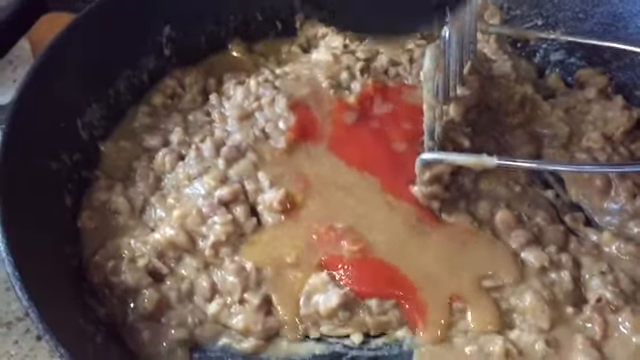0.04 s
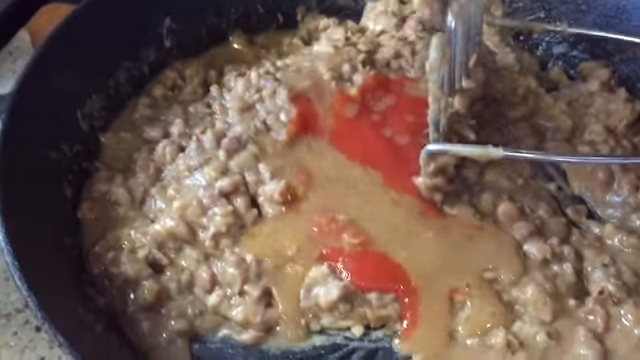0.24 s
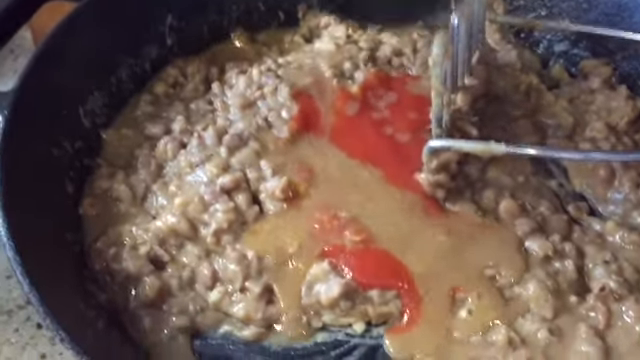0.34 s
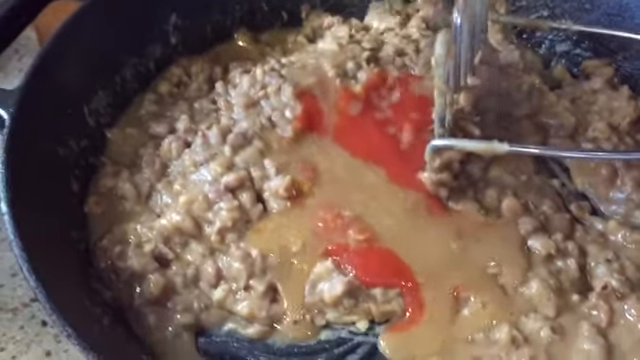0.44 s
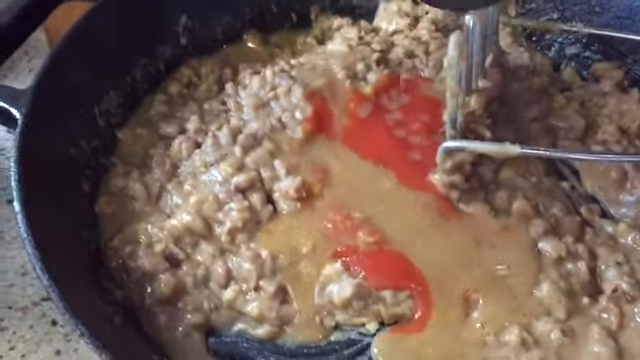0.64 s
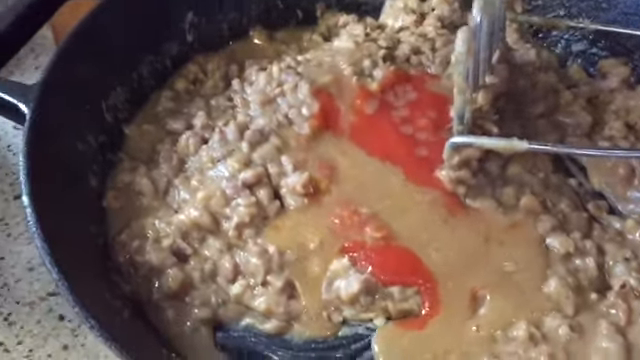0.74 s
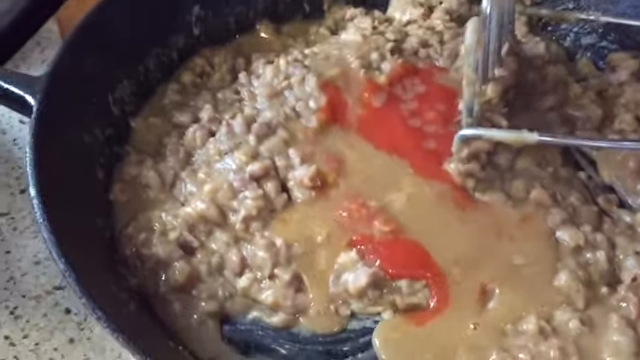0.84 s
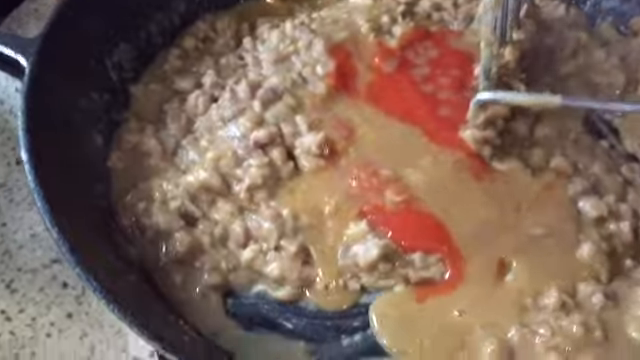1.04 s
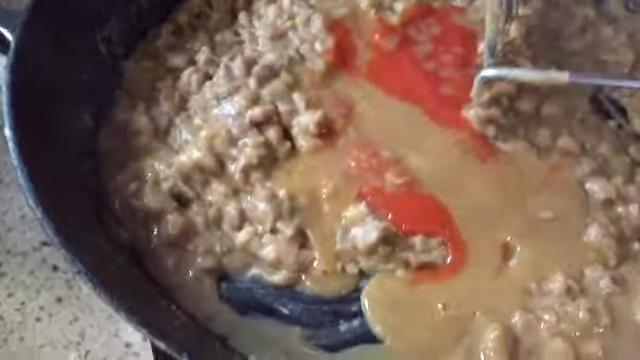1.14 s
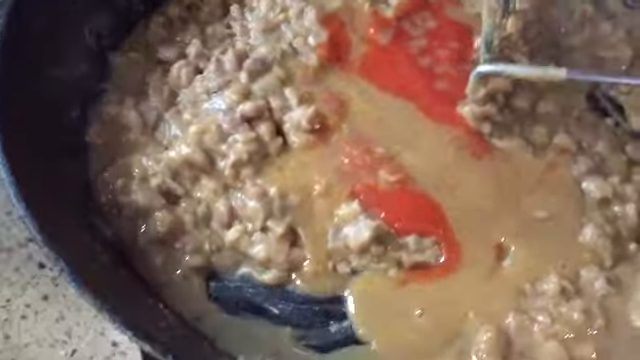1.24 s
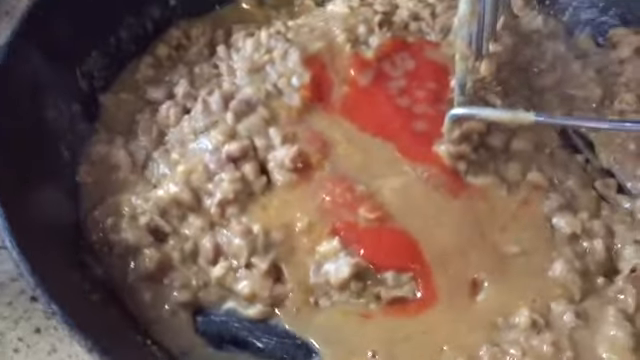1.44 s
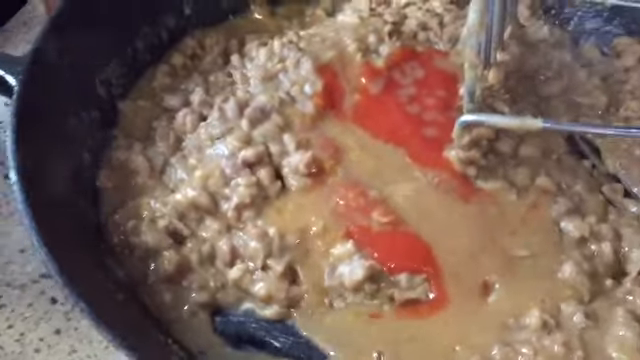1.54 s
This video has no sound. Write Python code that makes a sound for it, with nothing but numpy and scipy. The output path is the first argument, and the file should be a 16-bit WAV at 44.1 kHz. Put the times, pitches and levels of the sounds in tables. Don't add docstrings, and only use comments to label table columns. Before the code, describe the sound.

Four rapid hard clacks of a wire masher on a heavy iron pan, the third rattling most, then only faint wet food ticks over quiet low rumble and hiss; close, mono, short kitchen reverberation.

```python
import sys
import numpy as np
from scipy import signal
from scipy.fft import rfft, irfft
from scipy.io import wavfile

SR = 44100
rng = np.random.default_rng(int(sys.argv[2]) if len(sys.argv) > 2 else 0)


def transcribe(signal):
    frames = np.atleast_2d(signal).T
    limited = np.clip(frames, -1, 1)
    pcm = np.round(limited * 32767).astype(np.int16)
    wavfile.write(sys.argv[1], SR, pcm)


def field_ratio(decibels):
    return 10 ** (np.asarray(decibels, dtype=float) / 20)


N = 70560

# pitch_hz, level_db, t60_s
CLACK_MODES = [(1961, 4, .016), (2217, 5.5, 0.012)]
# start_s, clack_db, crack_db, iron_db (ring and room tail), bowl_db (hum)
KNOCKS = [
    (0.1032, -39, -46, -59, -80.5),
    (0.235, -12.5, -12, -37.5, -37),
    (0.3986, -16.5, -13.5, -41.5, -39.5),
    (0.5432, -17, -9, -39.5, -67),
    (0.7137, -18.5, -16, -38.5, -62),
]
start_s, clack_db, crack_db, iron_db, bowl_db = np.transpose(KNOCKS)


def clack():
    out = np.zeros(N)
    lag_s = 0.0005
    for k, (pitch_hz, level_db, t60_s) in enumerate(CLACK_MODES):
        hits = clicks(start_s + lag_s, field_ratio(clack_db + level_db))
        out += (-1) ** k * ring(hits, pitch_hz, t60_s)
    return out


# pitch_hz, level_db, t60_s
MASHER_MODES = [(1361, -19, 0.045), (3024, -13, .012), (2917, -20.5, 0.019), (3634, -7, 0.0098),
                (4012, -5.5, 0.0075), (4526, -7.5, 0.012), (5360, -14, 0.032), (6040, -10.5, 0.03),
                (6714, -19, 0.014), (6970, -9, 0.011), (8738, -20, 0.009), (9400, -22, 0.016),
                (10185, -40.5, .008), (13010, -31, 0.002)]


def masher_crack():
    luck_db = mode_luck_db(len(MASHER_MODES))
    out = ring(clicks(start_s, field_ratio(crack_db - 3)), 4200, 0.0022)
    for k, (pitch_hz, level_db, t60_s) in enumerate(MASHER_MODES):
        hits = clicks(start_s, field_ratio(crack_db + level_db + luck_db[:, k]))
        out += (-1) ** k * ring(hits, pitch_hz, t60_s)
    return out


def contact_snap():
    t60_s, low_hz, high_hz = 0.023, 2490, 8000
    hits = clicks(start_s, field_ratio(crack_db - 3))
    decay = signal.lfilter([1], [1, -field_ratio(-60 / (t60_s * SR))], hits + 1e-18)
    band = signal.butter(1, [low_hz, high_hz], "band", fs=SR, output="sos")
    return decay * signal.sosfilt(band, rng.standard_normal(N))


def thud():
    return ring(clicks(start_s, field_ratio(clack_db - 23)), 562, 0.044)


# start_s, level_db, centre_hz, length_s
REBOUNDS = [(0.1220, -47.5, 1820, 0.0018), (0.2440, -18, 1320, 0.0015), (0.2470, -27, 875, 0.0027),
            (0.4080, -28.5, 1356, 0.0013), (0.5532, -9.5, 2106, 0.0029), (0.5535, -14, 1286, 0.0027),
            (0.5533, -14.5, 3370, 0.0013), (0.5500, -14, 3780, 0.00081), (0.7240, -23, 6260, 0.0014),
            (0.5566, -11, 2160, 0.00067), (0.5586, -16, 2050, 0.0016), (0.5618, -27.5, 1850, 0.0013),
            (0.5640, -25, 1096, .003), (0.5708, -25, 2600, 0.0026), (0.7225, -22.5, 1072, 0.0043),
            (0.7250, -18.5, 1790, 0.001), (0.7600, -40.5, 2280, 0.0097)]
# start_s, level_db, centre_hz, length_s
TICKS = [(0.0155, -59, 7300, 0.0022), (0.0152, -47, 5500, .0003), (0.0480, -52.5, 3930, 0.00033),
         (0.0890, -60, 8000, 0.00011), (0.0970, -64.5, 1480, 0.0034), (0.1080, -53.5, 980, 0.01),
         (0.1470, -66, 2900, 0.00091), (0.1760, -57.5, 3500, 0.0009), (0.1820, -54.5, 6770, 0.00073),
         (0.2350, -44, 174.9, 0.024), (0.2750, -40.5, 140, 0.044), (0.6595, -58, 6100, 0.00026),
         (0.9200, -68, 8700, .0002), (1.0730, -64, 3470, 0.0045), (1.1700, -61.5, 6130, .0003),
         (1.2135, -44, 2900, 0.0018), (1.2080, -53, 2850, 0.0046), (1.2140, -66, 6020, .001),
         (1.4270, -66, 8750, .0003), (1.4750, -55.5, 304.3, 0.034), (1.4830, -63, 1680, 0.035),
         (1.4900, -69.5, 3686, .02), (1.5830, -63.5, 5460, 0.00032)]


def touches(contacts):
    out = np.zeros(N)
    for touch_s, level_db, centre_hz, length_s in contacts:
        hit = clicks([touch_s], field_ratio(level_db))
        for side in (-1, 1):
            out += side * ring(hit, centre_hz + side * 0.5 / length_s, 3.36 * length_s)
    return out


# pitch_hz, level_db, t60_s
SKILLET_MODES = [(588, -14, .9), (1058, -11, .5), (1766, -14, .4), (2510, -13, .25), (2790, -17, .2),
                 (530, -8, .15), (680, -4, .18), (830, -5, .2), (937, -4, .15), (1285, -2, .16),
                 (1525, -8, .16), (1968, -3, .16), (2202, -5, .14), (3195, -13, .2)]
# pitch_hz, level_db, t60_s
REBOUND_RING = [(2523, -45.5, .3), (2580, -51.5, .4), (331, -57, 0.41)]


def skillet_ring():
    luck_db = mode_luck_db(len(SKILLET_MODES))
    out = ring(clicks([0], field_ratio(-55)), SKILLET_MODES[0][0], SKILLET_MODES[0][2])
    for k, (pitch_hz, level_db, t60_s) in enumerate(SKILLET_MODES):
        hits = clicks(start_s, field_ratio(iron_db + level_db + luck_db[:, k]))
        out += waver() * ring(hits, pitch_hz, t60_s)
    for pitch_hz, level_db, t60_s in REBOUND_RING:
        out += ring(clicks([REBOUNDS[4][0]], field_ratio(level_db)), pitch_hz, t60_s)
    out += bowl_hum()
    damped_at_s, damped_t60_s = 0.89, 0.15
    resting_s = np.maximum(np.arange(N) / SR - damped_at_s, 0)
    return out * field_ratio(-60 * resting_s / damped_t60_s)


def bowl_hum():
    pitch_hz, t60_s, lag_s, swell_hz = 334, 0.19, 0.015, 9.2
    first = ring(clicks(start_s + lag_s, field_ratio(bowl_db)), pitch_hz, t60_s)
    hum = ring(first, pitch_hz, 1 / swell_hz)
    return waver() * hum * 2 * np.log(1000) * swell_hz / SR


def waver():
    depth, rate_hz, settle = 0.4, 12, 4000
    r = np.exp(-2 * np.pi * rate_hz / SR)
    drift = signal.lfilter([1], [1, -2 * r, r * r], rng.standard_normal(N + settle))
    return 1 + depth * rms_one(drift[settle:])


# pitch_hz, t60_s
ROOM_T60 = [(300, 0.1742), (800, 0.4047), (2100, 0.13), (5500, 0.22), (12000, 0.115)]
# pitch_hz, level_db
ROOM_COLOUR = [(300, 5), (900, -7), (2000, 2.5), (4000, 1.5), (8000, -13.5), (14000, -0.5)]


def kitchen_return(x):
    t = np.arange(SR // 2) / SR
    tail = np.zeros(len(t))
    for hz, band in third_octaves():
        tail += band[:len(t)] * field_ratio(at_hz(ROOM_COLOUR, hz) - 60 * t / at_hz(ROOM_T60, hz))
    rise_s = 0.0013
    tail = tail * (1 - np.exp(-t / rise_s)) / np.sqrt(SR / 60)
    return field_ratio(-9.5) * signal.fftconvolve(x, tail)[:N]


# pitch_hz, level_db
TAIL_COLOUR = [(200, -13), (500, -5.5), (1000, -6.5), (2000, 3), (4000, -5), (7000, -12.5), (11000, -22),
               (15500, -22.5)]


def knock_tail():
    rise_s = 0.0015
    hits = clicks(start_s, field_ratio(2 * iron_db)) + 1e-18
    hits = signal.lfilter([1], [1, -np.exp(-1 / (rise_s * SR))], hits) / (rise_s * SR)
    out = np.zeros(N)
    for hz, band in third_octaves():
        power = signal.lfilter([1], [1, -field_ratio(-120 / (at_hz(ROOM_T60, hz) * SR))], hits)
        out += band * np.sqrt(power) * field_ratio(at_hz(TAIL_COLOUR, hz))
    return field_ratio(14.5) * out


def third_octaves():
    edges = 150 * 2 ** np.arange(0, 6.8, 1 / 3)
    white = rng.standard_normal((2, N))
    for k, (low, high) in enumerate(zip(edges, edges[1:])):
        sos = signal.butter(2, [low, high], "band", fs=SR, output="sos")
        yield np.sqrt(low * high), signal.sosfilt(sos, white[k % 2])


# pitch_hz, level_db
RUMBLE = [(15, -57), (25, -29), (35, -21.5), (46, -6.5), (108, -2), (135, -11), (162, -16), (216, -29.5),
          (260, -32.5), (340, -65.5), (570, -120)]
# pitch_hz, level_db
HISS = [(120, -44), (200, -10.5), (306, -10), (419, -11.5), (1670, -15), (2090, -17), (2800, -19.5),
        (15300, -31), (16500, -46.5)]


def appliance_floor():
    return field_ratio(-50.5) * shaped_noise(RUMBLE) + field_ratio(-68) * shaped_noise(HISS)


def shaped_noise(spectrum):
    hz = np.maximum(np.fft.rfftfreq(N, 1 / SR), 1)
    inside = (hz > spectrum[0][0]) & (hz < spectrum[-1][0])
    colour = field_ratio(at_hz(spectrum, hz)) * inside
    return rms_one(irfft(rfft(rng.standard_normal(N)) * colour, N))


def mode_luck_db(count):
    return 2.0 * rng.standard_normal((len(start_s), count))


def rms_one(x):
    return x / np.sqrt(np.mean(x ** 2) + 1e-20)


def at_hz(points, hz):
    table_hz, value = np.transpose(points)
    return np.interp(np.log(hz), np.log(table_hz), value)


def clicks(times_s, gains):
    out = np.zeros(N)
    np.add.at(out, (np.asarray(times_s) * SR).astype(int), gains)
    return out


def ring(x, hz, t60_s):
    r = field_ratio(-60 / (t60_s * SR))
    w = 2 * np.pi * hz / SR
    return signal.lfilter([0, np.sin(w)], [1, -2 * r * np.cos(w), r * r], x + 1e-18)


def scene():
    modes = clack() + masher_crack()
    near = touches(REBOUNDS) + touches(TICKS)
    room = kitchen_return(near + 0.2 * modes) + knock_tail()
    mix = near + modes + contact_snap() + thud() + skillet_ring() + room + appliance_floor()
    return mix[None]


def band_limit(x):
    return signal.sosfilt(signal.butter(12, 16870, fs=SR, output="sos"), x)


def record(dry):
    low_cut = signal.butter(2, 25, "high", fs=SR, output="sos")
    top_cut = signal.cheby2(10, 60, 16900, fs=SR, output="sos")
    mix = signal.sosfilt(top_cut, signal.sosfilt(low_cut, dry))
    return band_limit(mix)


dry = scene()
out = record(dry)
transcribe(out)
```